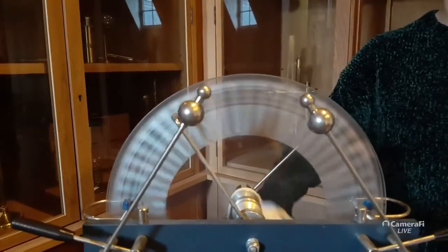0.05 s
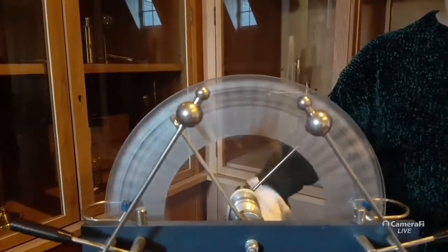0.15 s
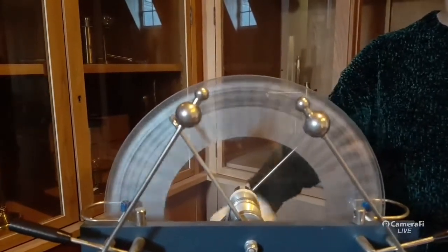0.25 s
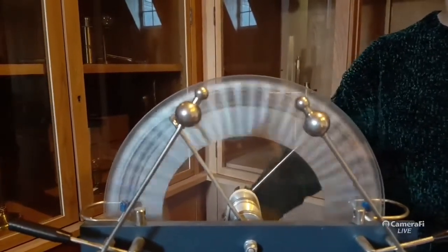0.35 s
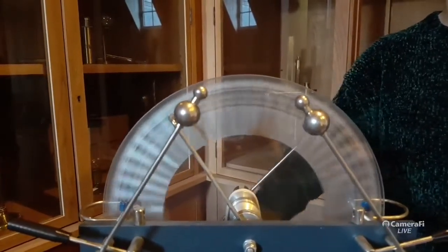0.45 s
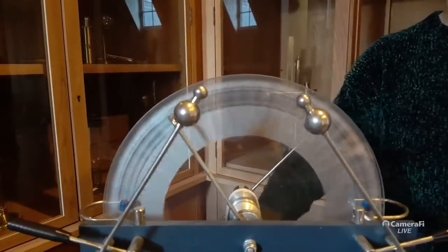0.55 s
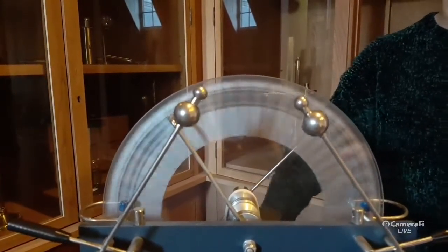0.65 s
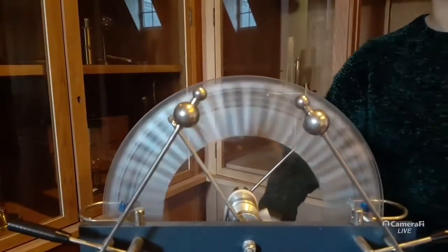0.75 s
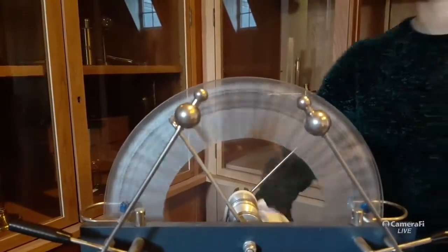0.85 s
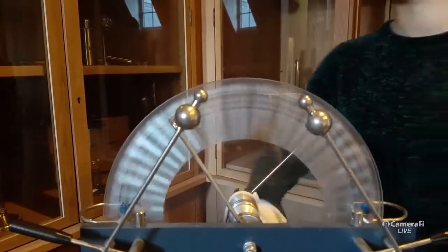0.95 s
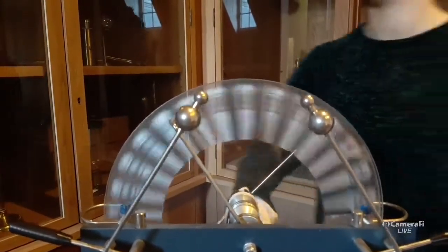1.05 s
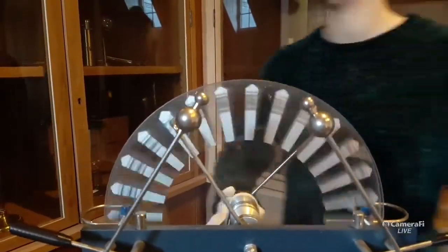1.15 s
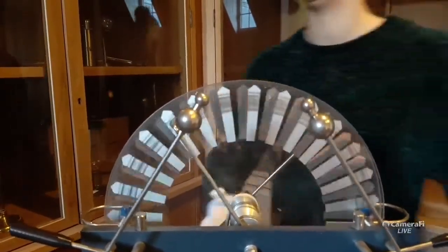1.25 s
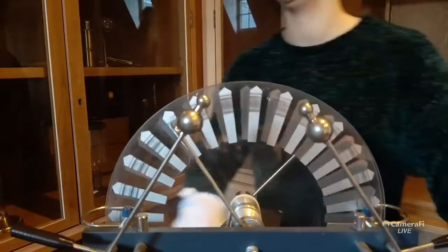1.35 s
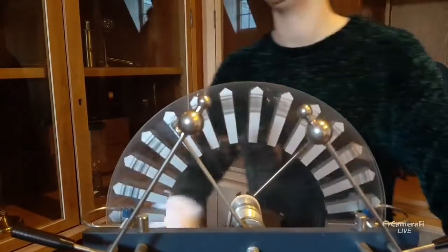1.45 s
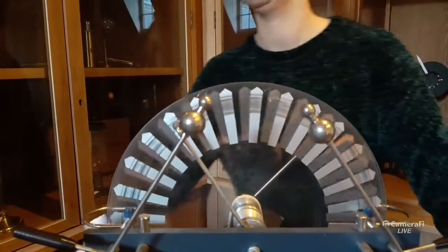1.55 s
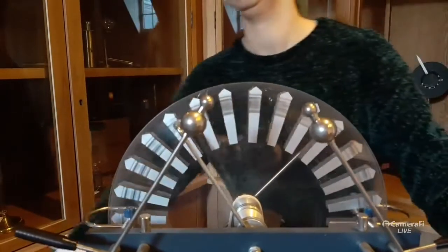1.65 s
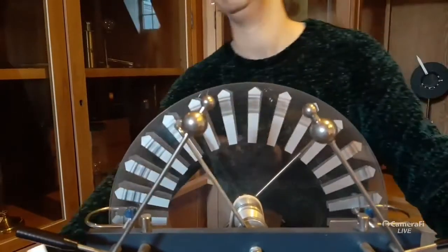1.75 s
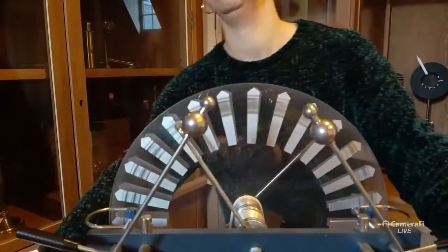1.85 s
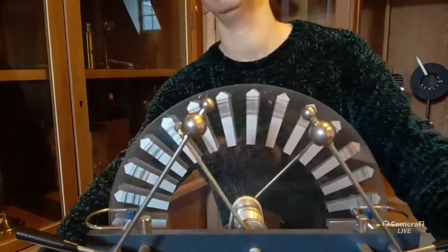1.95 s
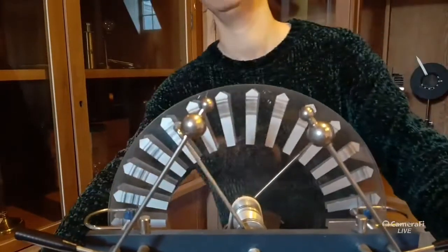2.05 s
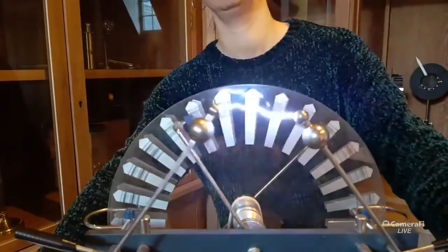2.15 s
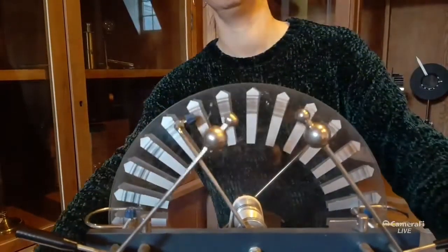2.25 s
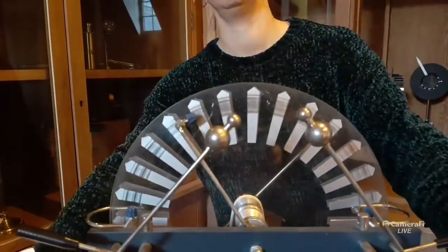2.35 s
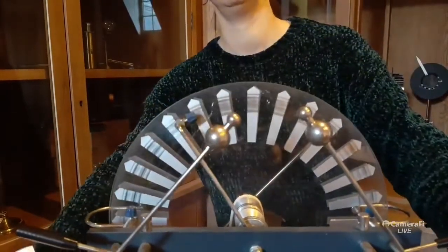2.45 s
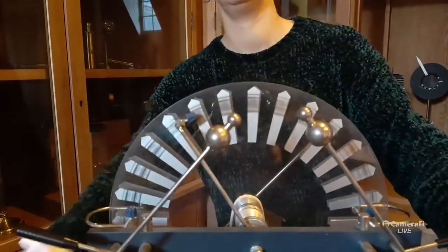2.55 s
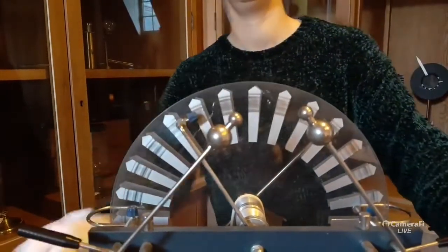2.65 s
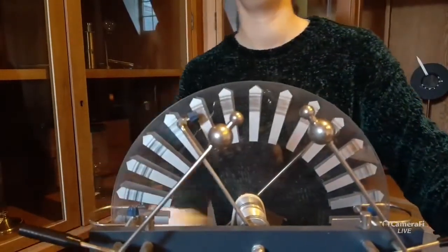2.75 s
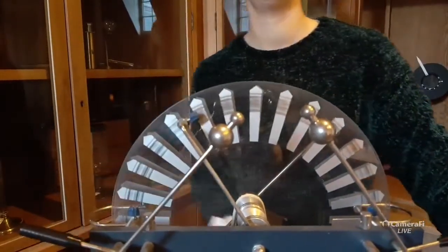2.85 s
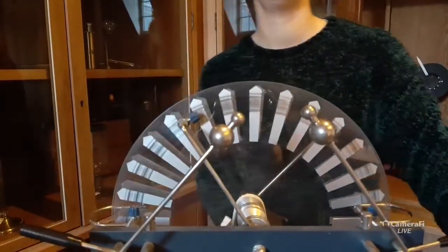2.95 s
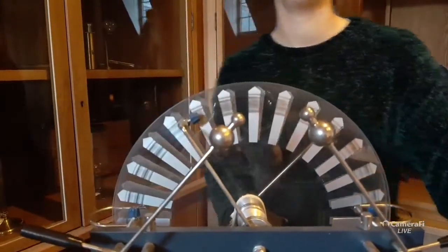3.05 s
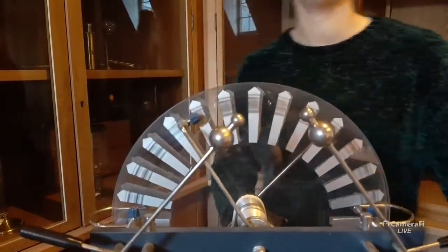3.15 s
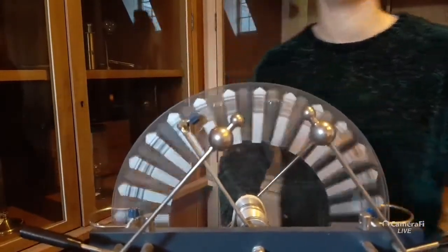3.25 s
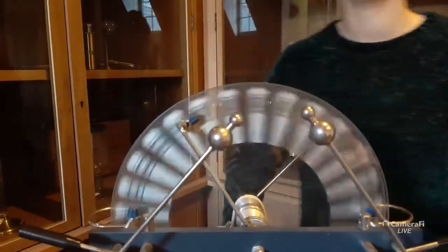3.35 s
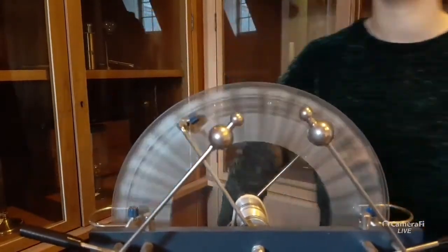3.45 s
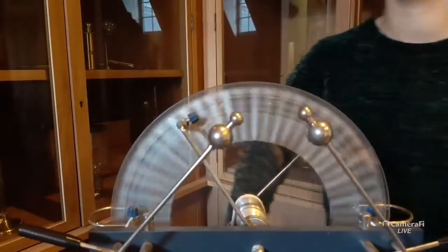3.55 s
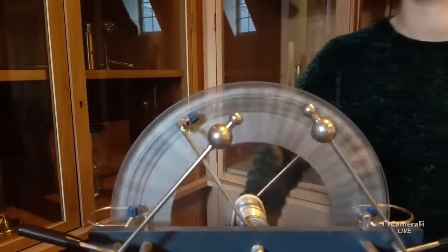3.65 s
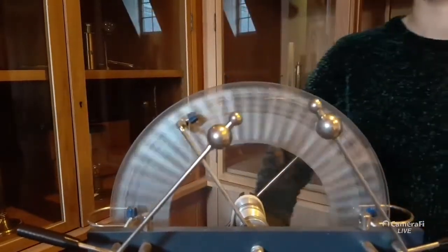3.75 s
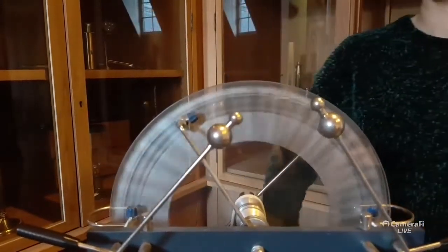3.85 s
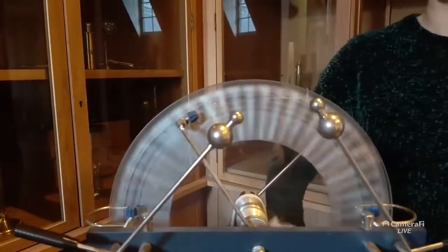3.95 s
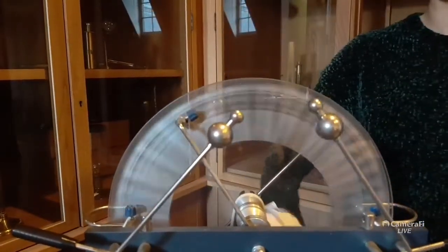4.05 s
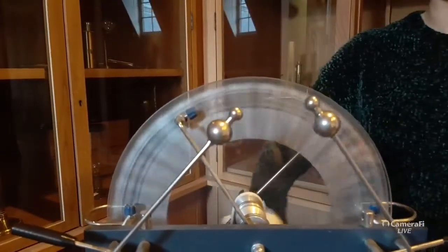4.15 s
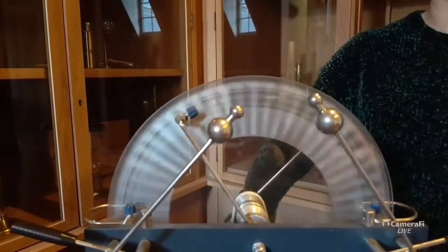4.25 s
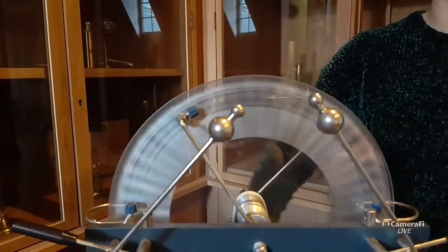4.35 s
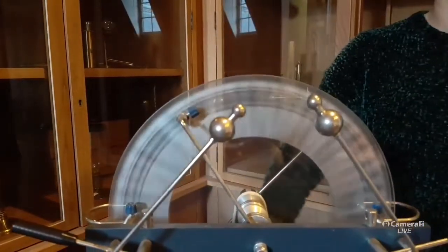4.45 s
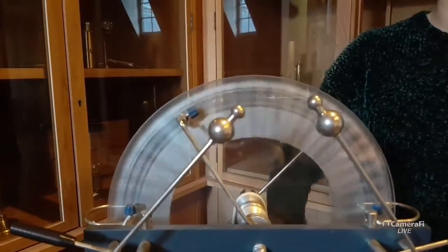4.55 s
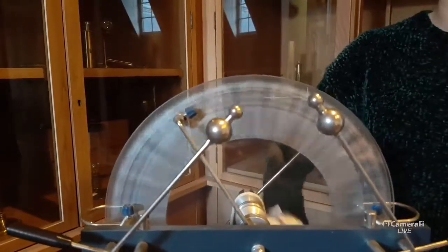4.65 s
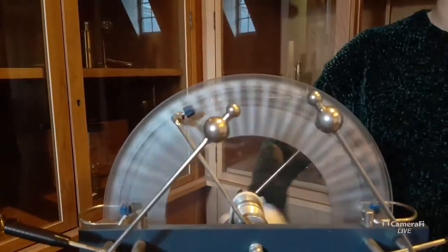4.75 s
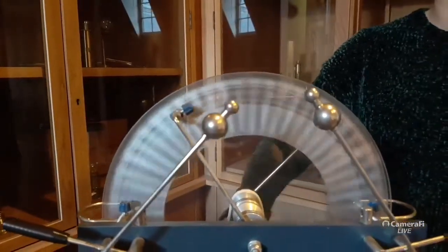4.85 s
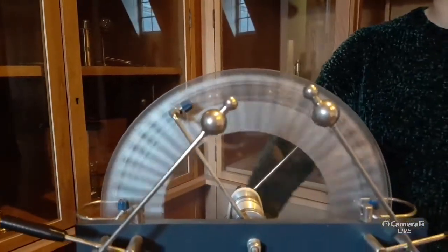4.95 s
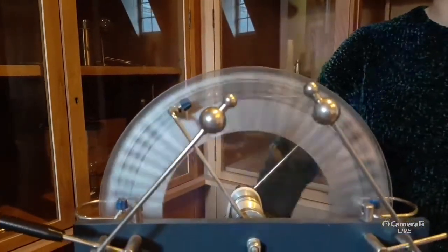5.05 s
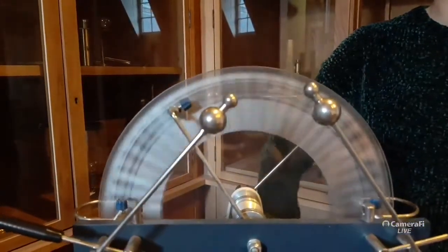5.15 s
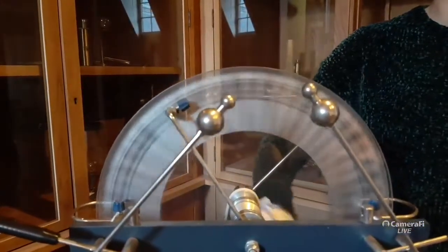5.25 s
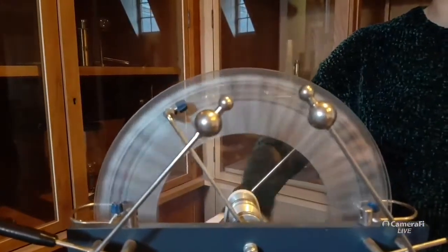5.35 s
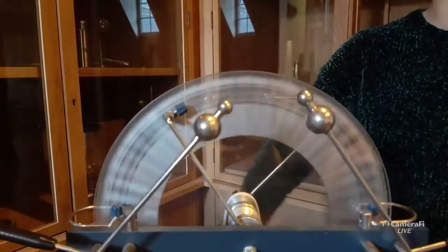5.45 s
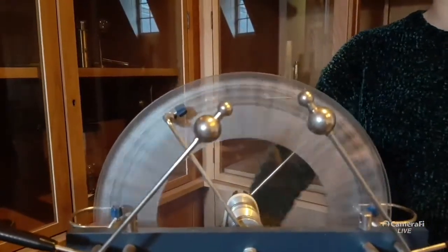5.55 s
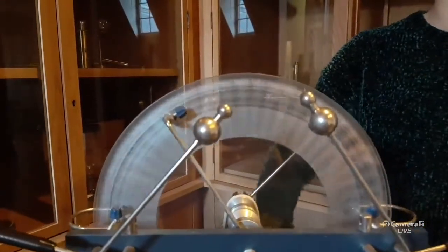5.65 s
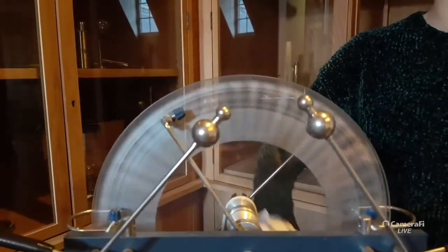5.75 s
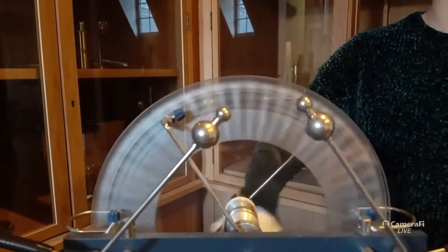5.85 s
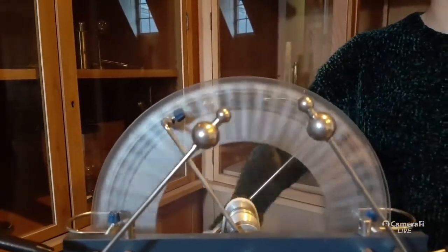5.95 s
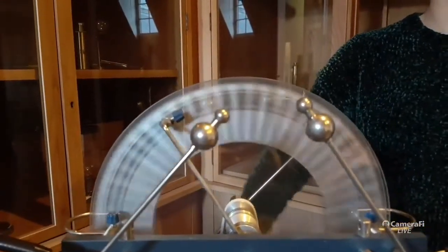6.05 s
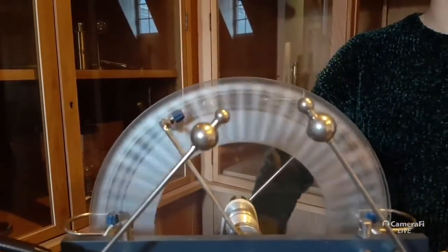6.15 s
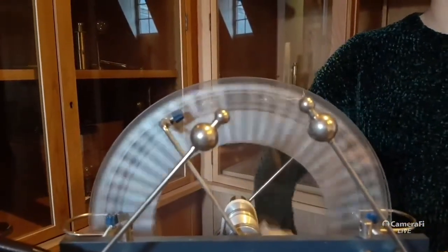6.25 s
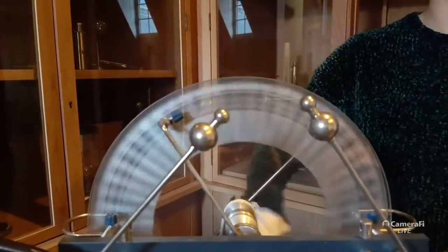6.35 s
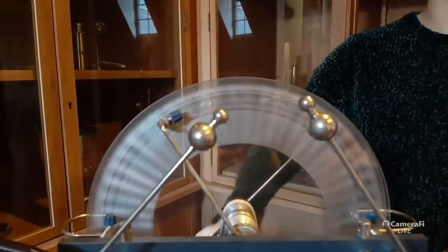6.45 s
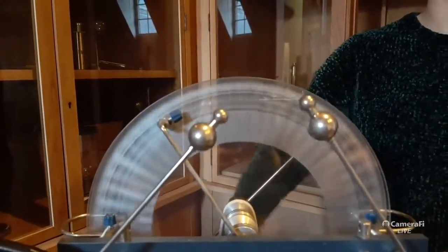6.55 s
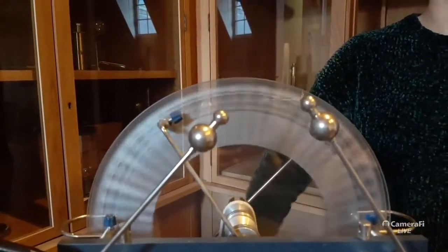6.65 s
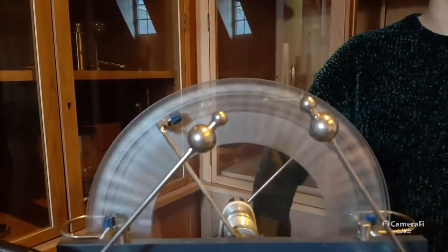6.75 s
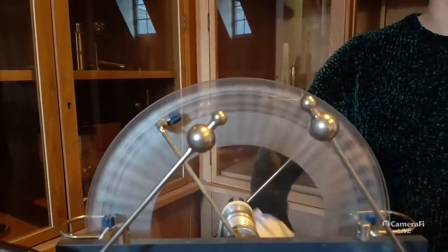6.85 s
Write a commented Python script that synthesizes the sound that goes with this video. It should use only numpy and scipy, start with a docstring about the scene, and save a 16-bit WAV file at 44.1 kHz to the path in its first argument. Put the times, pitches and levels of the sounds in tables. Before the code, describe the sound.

Rattling cranked discs with hissing, spitting brushes slow to near silence; a huge spark bangs, joint clicks, belt squeaks, and cranking resumes with two cracks.

```python
"""A hard-walled hall, with a hand-cranked influence machine close to the microphone.
Quiet noise and a thin tone lie underneath. Knocks and bearing rub ring the frame's resonances; the belt
rubs and squeaks, and a discharge rod clicks in its joint. Shaped noise makes the brushes scrape, fizz and spit.
Three big sparks, noise blasts with echoes, overload the microphone stage: its low-cut filter rings, the limiter
ducks and lets the hall's answer swell back."""
import sys
import numpy as np
from scipy import signal
from scipy.fft import rfft, irfft, next_fast_len
from scipy.io import wavfile
from scipy.ndimage import uniform_filter1d, minimum_filter1d, map_coordinates

SR = 44100
rng = np.random.default_rng(int(sys.argv[2]) if len(sys.argv) > 2 else 0)


def inscribe(sig):
    """Save sig as 16-bit PCM at rate SR to the path in sys.argv[1].

    A 1-D sig is mono; a 2-D sig holds one channel per row.
    Samples are clipped to [-1, 1] before scaling.
    """
    pcm = np.round(np.clip(np.atleast_2d(sig).T, -1, 1) * 32767)
    wavfile.write(sys.argv[1], SR, pcm.astype(np.int16))


N = 304290  # length in samples


def amp(db):
    """Gain of a level in dB."""
    return 10 ** (np.asarray(db) / 20)


def unit(x):
    """x at rms 1."""
    return x / np.sqrt(np.mean(x ** 2) + 1e-20)


def white():
    """White noise as long as the scene."""
    return rng.standard_normal(N)


def along(points, hz):
    """Reads a curve of (hz, value) points on a log frequency axis."""
    f, v = np.transpose(points)
    return np.interp(np.log(hz + 1), np.log(f + 1), v)


def curves(points):
    """One automation curve, a value per sample, for each column after the time."""
    s, *columns = np.transpose(points)
    return [np.interp(np.arange(N) / SR, s, c) for c in columns]


def wobble(rate):
    """A smooth random curve, rate knots a second."""
    return map_coordinates(rng.standard_normal(int(N * rate / SR) + 4), [np.arange(N) * rate / SR])


def filtered(x, response):
    """x times a complex response of frequency."""
    m = next_fast_len(len(x) + SR // 2)
    return irfft(rfft(x, m) * response(np.fft.rfftfreq(m, 1 / SR)), m)[:len(x)]


def coloured(x, spectrum):
    """x through a causal minimum-phase filter of that spectrum, which keeps the power of white noise."""
    gain = amp(along(spectrum, np.fft.rfftfreq(8192, 1 / SR)))
    cepstrum = irfft(np.log(np.maximum(gain, 1e-5)))
    cepstrum[1:4096] *= 2  # folding the cepstrum puts the energy first
    cepstrum[4097:] = 0
    h = irfft(np.exp(rfft(cepstrum)))
    return signal.fftconvolve(x, h / np.linalg.norm(h))[:len(x)]


def ringing(x, modes):
    """x through damped resonances; the mode levels set their balance."""
    def response(f):
        return sum(amp(db) * SR / (2 * np.pi) * c / (c * c - f * f + 1j * f * w) for c, w, db in modes)
    return filtered(x, response)


def add(track, s, sound):
    """Mixes a sound into a track at s seconds."""
    part = track[round(s * SR):][:len(sound)]
    part += sound[:len(part)]


# how long each frequency lives in the hall: pitch_hz, t60_s
HALL_DECAY = [(200, 0.67), (700, 0.87), (2000, 1), (4000, 0.96), (5500, 0.81), (8000, .64), (11000, 0.46),
              (16000, 0.39)]


def tail():
    """One answer of the hall, energy 1: noise in which each frequency dies at its own speed."""
    hz, t, z = signal.stft(rng.standard_normal(SR), SR, nperseg=256)
    fade = amp(-60 * t / along(HALL_DECAY, hz)[:, None])
    h = signal.istft(z * fade, SR, nperseg=256)[1]
    return h / np.linalg.norm(h)


def hall(x, db):
    """x with the hall's answer, which starts after a few ms."""
    return x + amp(db) * signal.fftconvolve(np.pad(x, (200, 0)), tail())[:N]


def struck(rows, modes, column, attack_s, rough_db, crunch_db, crunch_s):
    """Soft blows: modes swell, ring and die at varied strengths, with a puff of contact noise around them.

    column says which level of a row sets each mode: 0 middle, 1 low, 2 high."""
    out, puffs, t = np.zeros(N), np.zeros((3, N)), np.arange(SR // 12) / SR
    hz, width, mode_db = np.transpose(modes)[:, :, None]
    attack = 1 - np.exp(-t / attack_s)
    swell = attack ** 2 * np.exp(-np.pi * width * t)
    for (s, level_db, *rel_db), luck in zip(rows, rng.standard_normal((len(rows), 3, len(modes), 1))):
        group_db = level_db + np.array([0] + rel_db)
        gain = amp(group_db[column][:, None] + mode_db + 2 * luck[0])
        tones = np.sin(2 * np.pi * hz * (1 + 0.015 * luck[1]) * t + np.pi * luck[2])
        add(out, s - .001, np.sum(gain * swell * tones, 0))
        for track, db in zip(puffs, group_db):
            add(track, s, amp(db + crunch_db) * np.exp(-t / crunch_s) * attack)
    for group, (c, w, db) in zip(column, modes):
        band = signal.butter(2, [c / 1.242, c * 1.171], "band", fs=SR, output="sos")
        out += amp(db) * np.sqrt(SR / c) * signal.sosfilt(band, puffs[group] * white())
    return out * amp(rough_db * wobble(600))  # loose parts chatter while they ring


# noise floor colour: pitch_hz, relative level_db
QUIET_COLOUR = [(88, -29), (150, 1), (210, -11), (330, -18), (783, -24), (1620, -23), (1750, -18),
                (1860, -26), (9150, -36), (15000, -24), (16500, -39)]
# thin tone's fade in and out: time_s, peak level_db
TONE_FADE = [(1.95, -110), (2.05, -76.5), (2.4, -83), (3.45, -86), (3.7, -110)]
QUIET_DB = -72.5  # rms


def background():
    """Quiet hall noise and a thin sine tone that comes and goes."""
    tone = amp(curves(TONE_FADE)[0]) * np.sin(2 * np.pi * 1736 * np.arange(N) / SR)
    return amp(QUIET_DB) * coloured(white(), QUIET_COLOUR) + tone


# how hard the machine is driven, also for brushes and belt: time_s, frame drone level_db before its wobble
DRIVE = [(0, -42), (.4, -42), (.85, -46), (1.04, -43), (1.12, -50.5), (1.3, -79), (1.45, -95), (3.45, -95),
         (3.63, -64.5), (4.04, -61.5), (4.5, -49), (4.65, -45), (5.15, -43), (5.6, -49.5), (6.1, -50),
         (6.3, -47), (6.9, -48)]
RATTLE_DB = 0.5  # centre level of the small knocks over the drone


def chance_knocks(count):
    """Small knocks at random moments, following the drive, each with its own balance of modes."""
    moment, luck = rng.random(count) * N / SR, rng.standard_normal((count, 3))
    level_db = np.interp(moment, *np.transpose(DRIVE)) + RATTLE_DB + 3 * luck[:, 0]
    return np.column_stack([moment + .002, level_db, 4 * luck[:, 1:]])


# louder knocks of crank and pulleys: start_s, main modes level_db, low modes relative_db, high modes relative_db
LOUD_KNOCKS = [(.013, -31, -5, -16), (.036, -26.5, -9, -13), (.051, -32.5, 3, 7.5),
               (.068, -23.5, 1.5, -2.1), (.189, -29.5, 2, 0), (.205, -52, 26, 30.5), (.22, -37, 10, 2),
               (.274, -23.5, -2, -5), (.303, -25.5, -2, -6.5), (.415, -24.5, -22, -21),
               (.433, -22, -18, -14), (.461, -28, -3.5, -7), (.538, -22, -5.5, -8.5), (.587, -29, -10, 1),
               (.603, -24.5, -0.5, -1.5), (.631, -38.5, 11, -10), (.734, -44.5, 2.1, 14.5),
               (.748, -31.5, 4, 0.5), (.762, -44, 17, 11), (.779, -31, 7.5, 10), (.889, -29, .1, -8.5),
               (.978, -28.5, -13, -20), (1.004, -29.5, -4, -4), (1.031, -34, 5, 2), (1.315, -57.5, -6, -23),
               (1.346, -56.5, -20, -12), (3.839, -49, -16, -4), (3.974, -38.5, -11, -15),
               (3.991, -32, -28, -14), (4.011, -34, -4.5, -13), (4.048, -40.5, 0, -11),
               (4.077, -36.5, -3.5, -25), (4.195, -38.5, -7, -7), (4.266, -39, -12, -20),
               (4.307, -29, -13, -20), (4.327, -24.5, -16, -18), (4.58, -37, 0, -8), (4.599, -18, -11, -11),
               (4.687, -35.5, 1, -10.5), (4.715, -24, -8, -13), (4.769, -24, -8, -7),
               (4.803, -29.5, 3.5, 0), (4.83, -38.5, 11, 7.5), (4.911, -49, 18.5, -5), (5.034, -40, 5, 12),
               (5.049, -32, 7, -5), (5.061, -41, 11.5, 18.5), (5.075, -18.5, -3, -11.5),
               (5.106, -29.5, -11, -16), (5.181, -19, -9.5, -23.5), (5.285, -40.5, 9, -2),
               (5.522, -38, 7, 5), (5.536, -35, -2, -5), (5.624, -25, -14, -19), (5.733, -39, 6.5, 6.5),
               (5.748, -21.5, -32, -10.5), (5.762, -32.5, -2, -6), (5.844, -22, -10, -17.5),
               (5.94, -49.5, -6, 11), (5.972, -32.5, -3, -4), (6.051, -32, -3, -6),
               (6.081, -30.5, 0.5, -11), (6.095, -46, 14, 11), (6.156, -37, -1, -5), (6.174, -34.5, -7, .6),
               (6.188, -36, 1.1, -4), (6.203, -30.5, -4, -1), (6.281, -21.5, -10, -11.5),
               (6.359, -40, -1, -7), (6.389, -33, -7, -5), (6.406, -23, -16, -23), (6.416, -29.5, 5.5, 0.5),
               (6.627, -30.5, 1, 1), (6.712, -22.5, -12, -14), (6.74, -33, -1, -4), (6.823, -33, -3, 0),
               (6.836, -21, -23, -8), (6.845, -25, -8.5, -12), (6.87, -29, -7, -13)]
# frame resonances: pitch_hz, width_hz when struck, relative level_db
FRAME_MODES = [(364, 130, -0.5), (573, 176, 6), (968, 22.6, -5), (1070, 58, -4.5), (1457, 98, 4.5),
               (2100, 89, -5), (2414, 150, 0), (3060, 170, -12.5)]
# table rumble colour: pitch_hz, relative level_db
TABLE_COLOUR = [(12, -40), (20, -5), (43, 15.5), (69, -6), (97, 13), (108, 5.5), (136, 0), (179, -1),
                (227, -10), (286, 2), (310, -9.5), (350, -2.5), (460, -33.5), (770, -120)]
TABLE_DB, TABLE_REST_DB = -5, -60.5  # shaking over the drone; constant rumble before its wobble and bass filter
COAST_S = .19  # time constant with which the shaking follows the drive


def frame():
    """Knocks ring the frame; the bearings drone through the same modes and shake the table."""
    knocks = struck(np.vstack([LOUD_KNOCKS, chance_knocks(count=130)]), FRAME_MODES,
                    column=[1, 1, 0, 0, 2, 2, 2, 2], attack_s=0.00075,
                    rough_db=1.5, crunch_db=-12.5, crunch_s=0.0066)
    grit = amp(1.2 * wobble(70)) * white()
    damped = [(hz, 3 * width, db) for hz, width, db in FRAME_MODES]  # a rubbing bearing damps the modes
    drone = amp(curves(DRIVE)[0] + 1.6 * wobble(9.8))
    shaking = np.abs(filtered(drone, lambda hz: 1 / (1 + 2j * np.pi * hz * COAST_S)))
    rumble = amp(TABLE_DB) * shaking * coloured(white(), TABLE_COLOUR)
    # a constant bass rumble remains when the discs stand still
    deep = filtered(coloured(white(), TABLE_COLOUR), lambda hz: 1 / (1 + (hz / 160) ** 4))
    rumble = rumble + amp(TABLE_REST_DB + 1.3 * wobble(3.6)) * deep
    return hall(knocks, db=-13) + drone * unit(ringing(grit, damped)) + rumble


# pulley resonances before friction broadens them: pitch_hz, width_hz, relative level_db
PULLEY_MODES = [(2100, 42, -4.5), (2465, 56, 2), (3140, 120, 4.5), (3500, 80, 0), (4160, 86, 0),
                (4620, 100, 1), (5160, 130, -6)]
# belt rubbing harder on a push of the crank: peak_s, level_db, time to fall 20 dB on each side fall_s
CRANK_PUSHES = [(3.83, -57, .13), (4.015, -50, .08), (4.2, -51, .09), (4.35, -50, .085), (4.505, -46, .08),
                (4.625, -48, .07), (4.72, -45, .04), (4.79, -49, .14), (4.96, -50, .1), (5.06, -44, .07),
                (5.75, -51, .05), (6.19, -49, .05), (6.418, -40, .012)]
RUB_DB = -19.5  # steady rub over the frame drone's curve


def belt():
    """Rough friction noise through the pulley's resonances, swelling with each push."""
    t = np.arange(N) / SR
    rub = amp(curves(DRIVE)[0] + RUB_DB)
    for s, db, fall in CRANK_PUSHES:
        rub += amp(db - 20 * ((t - s) / fall) ** 2)
    grit = amp(3 * wobble(120)) * white()
    broad = [(hz, 2.2 * width, db) for hz, width, db in PULLEY_MODES]
    return rub * unit(ringing(grit, broad))


# clicks of the rod's joint: start_s, middle modes level_db, low modes relative_db, bright modes relative_db
JOINT_CLICKS = [(3.0105, -38, -15.5, -5.5), (3.014, -31, -8.5, -4), (3.0539, -26.5, -15.5, 8),
                (3.0578, -21, -8.5, -40), (3.1098, -34, -8, -16), (3.1157, -41, -23, -4),
                (3.2027, -49, 0, -21), (3.2197, -31.5, -11, -7), (3.2236, -32.5, -4.5, -21),
                (3.255, -59.5, -18.5, -14.5), (3.2602, -40.5, 2.5, -29)]
# rod resonances: pitch_hz, width_hz, relative level_db
ROD_MODES = [(315, 63, -9), (469, 79, -3.5), (798, 240, 4), (1145, 180, 1), (1514, 70, -6),
             (2070, 51, -14.5), (2450, 240, -4), (3450, 930, 2.5), (4250, 310, -4), (5150, 1550, -11),
             (6800, 510, -9)]


def rod():
    """The discharge rod clicks in its joint and rings its damped modes."""
    clicks = struck(JOINT_CLICKS, ROD_MODES, column=[1, 1, 1, 0, 0, 0, 0, 2, 2, 2, 2], attack_s=0.0006,
                    rough_db=3.5, crunch_db=-20, crunch_s=0.0079)
    return hall(clicks, db=-15.5)


# belt squeaks, one list for each singing partial: time_s, pitch_hz, dry rms level_db
SQUEAK_PARTIALS = [
    [(3.57, 4220, -67), (3.586, 4205, -40.5), (3.614, 4286, -32.5), (3.625, 4500, -39)],
    [(3.618, 4770, -48), (3.644, 4613, -42), (3.666, 4600, -57), (3.684, 4655, -58), (3.695, 4634, -62)],
    [(3.575, 10900, -74), (3.619, 11098, -60), (3.635, 11267, -72), (3.66, 11108, -72)],
    [(4.475, 3986, -56), (4.495, 4026, -47), (4.51, 4100, -65)],
]


def squeak():
    """The belt slips on the pulley and sings: gliding sines with a weak second harmonic."""
    out, t = np.zeros(N), np.arange(N) / SR
    for rows in SQUEAK_PARTIALS:
        hz, db = curves(rows)
        on = np.clip(np.minimum(t - rows[0][0], rows[-1][0] - t) / 0.0043, 0, 1)
        phase = 2 * np.pi * np.cumsum(hz) / SR
        out += on * amp(db) * np.sqrt(2) * (np.sin(phase) + amp(-35.5) * np.sin(2 * phase))
    return hall(out, db=-14)


# foil sectors passing a brush: time_s, rate_per_s
SECTOR_RATE = [(0, 102), (.8, 98), (.95, 86), (1.2, 40), (1.45, 12), (1.5, .2), (3.42, .2), (3.55, 36),
               (3.75, 70), (4.22, 83), (4.45, 95), (4.65, 109), (5.15, 120), (5.5, 126), (6, 127),
               (6.45, 132), (6.9, 132)]
# sectors that pass after each spark until the hiss is halfway back: one count per spark
RECHARGE_SECTORS = [68.5, 133, 106]
RECHARGE_SPREAD = 18  # sectors; smaller = a more sudden return
EMPTY_DB, FULL_DB = -58.5, -44.5  # corona hiss when empty and at full charge, before stalling
STALL_PER_S, STALL_DB = 75, 45  # under this sector rate the hiss falls, dB for a tenth of the rate


def corona_db():
    """The hiss follows the charge: sparks empty it, passing sectors refill it, and it dies as the discs stall."""
    speed, charge = curves(SECTOR_RATE)[0], np.ones(N)
    passed = np.cumsum(speed) / SR
    for (s, *_), halfway in zip(SPARK_EVENTS, RECHARGE_SECTORS):
        start = round(s * SR)
        since = passed[start:] - passed[start]
        charge[start:] = 1 / (1 + np.exp((halfway - since) / RECHARGE_SPREAD))
    stall = STALL_DB * np.minimum(0, np.log10(speed / STALL_PER_S))
    return EMPTY_DB + (FULL_DB - EMPTY_DB) * charge + stall


# brush discharges: start_s, level_db before shaping, length_s
BRUSH_SPITS = [(.016, -25.5, .011), (.07, -25, 0.0097), (.107, -29.5, 0.023), (.211, -25.5, 0.026),
               (.3357, -22.5, 0.0085), (.393, -44, .002), (.399, -24.5, 0.0125), (.434, -28, .001),
               (.495, -23.5, 0.0057), (.531, -21.5, 0.0052), (.542, -29, 0.0011), (.587, -29, 0.024),
               (.715, -25.5, 0.0091), (.7325, -21, 0.0013), (.75, -25.5, .02), (.89, -24.5, 0.0092),
               (.95, -17, 0.00024), (.959, -24, 0.0044), (.986, -23, 0.00082), (1.002, -32, 0.0188),
               (1.102, -32.5, .00067), (1.157, -34, 0.001), (1.192, -31, 0.00047), (1.2371, -20, 0.00022),
               (1.333, -48, 0.00069), (1.383, -36, 0.00042), (2.197, -57.5, 0.0011), (3.602, -42.5, 0.0014),
               (4.788, -29.5, .001), (5.024, -32.5, .0013), (5.057, -35, .002), (5.133, -29, 0.0024),
               (5.1648, -7.5, 0.00086)]
# corona colour: pitch_hz, relative level_db
CORONA_COLOUR = [(1470, -29.5), (2500, -7), (2860, -21.5), (3710, -7), (5090, -4), (6300, -6.5), (7490, 1),
                 (8430, -10), (9570, -8), (10500, -2.5), (14200, 2.5), (16000, -4), (16500, -18)]
# colour of wire brushes on the discs: pitch_hz, relative level_db
SCRAPE_COLOUR = [(1530, -26), (2600, -4.5), (2870, -7.5), (3150, 0), (3480, -0.5), (3780, -9.5), (4530, 1),
                 (4980, -7), (5470, -7.5), (5820, -1), (7580, 0), (8500, -12), (9000, -15), (11700, -45),
                 (19800, -120)]
SCRAPE_DB = -6.5  # noise of the scrape over the frame drone's curve


def brushes():
    """The brushes scrape the discs, hiss, tick as the foil sectors pass, and spit short dense discharges."""
    hiss_db, scrape_db = corona_db(), curves(DRIVE)[0] + SCRAPE_DB
    speed = curves(SECTOR_RATE)[0]
    count = np.floor(np.cumsum(speed) / SR + .06 * wobble(60))  # slightly uneven spacing
    passed = np.diff(count, prepend=0) > 0
    sizes = passed * amp(2.5 * white())
    ticks = unit(signal.lfilter([1], [1, -.975], sizes) * white())
    ticks = ticks * np.clip(STALL_PER_S / speed, 1, 3)  # they stand out as the discs slow
    fizz = amp(hiss_db + 1.5 * wobble(25)) * (white() + .6 * ticks)
    scrape = amp(scrape_db + 2 * wobble(18)) * (white() + .8 * ticks)
    spits, t = np.zeros(N), np.arange(SR // 10) / SR
    for s, db, length in BRUSH_SPITS:
        sag = -5 * t / max(length, .0003)
        break_off = -60 * np.maximum(t - length, 0) / (0.024 + length)
        add(spits, s, amp(db + sag + break_off) * (1 - np.exp(-t / .0003)))
    streamers = amp(1.7 * wobble(900)) * white()  # a discharge is a swarm of tiny sparks
    discharges = hall(coloured(spits * streamers, CORONA_COLOUR), db=-10.5)
    return coloured(fizz, CORONA_COLOUR) + coloured(scrape, SCRAPE_COLOUR) + discharges


# big sparks: start_s, crack level_db, overload offset level_db before its onset, offset decay_s, hall level_db
SPARK_EVENTS = [(2.3265, 25.5, 27, 0.0023, 21), (5.1996, 10.5, 18.5, 0.0049, 17),
                (6.4775, 11, 21, 0.0023, 18.5)]
# near wall reflections: lag_s, centre level_db relative to the crack
WALL_ECHOES = [(.0047, -17), (.0097, -13), (.0146, -17), (.0280, -26)]
# crack colour: pitch_hz, relative level_db
CRACK_COLOUR = [(100, -31), (400, 1.5), (1200, -3), (3000, -9.5), (7000, -13), (9000, -22.5), (12000, -10),
                (16000, -8.5)]
# colour of the hall's first answer to a spark: pitch_hz, relative level_db
ECHO_COLOUR = [(88, -54.5), (150, -27.5), (479, -15), (656, -12), (847, -16), (1030, -12.5), (1440, -14),
               (2010, -7), (2450, -9.5), (4780, -5), (7220, -1.5), (8620, -9.5), (11100, 1), (15600, -3),
               (16500, -44.5)]


def sparks():
    """A blast scattered by balls and discs, wall echoes, the hall, and the overloaded capsule's offset."""
    blast, echo, offset = np.zeros((3, N))
    t = np.arange(SR // 10) / SR
    wave = (1 - t / .0001) * np.exp(-t / .0001)  # overpressure, then suction
    fade = amp(-60 * np.maximum(t - .003, 0) / .005)  # full for 3 ms, then 60 dB down in 5 ms
    for s, crack_db, offset_db, decay, hall_db in SPARK_EVENTS:
        add(blast, s, amp(crack_db) * rng.standard_normal(len(t)) * fade)
        for lag, db in WALL_ECHOES:
            add(blast, s + lag, amp(crack_db + db + rng.normal(0, 1.5)) * wave)
        add(offset, s + 0.003, -amp(offset_db) * np.exp(-t / decay) * (1 - np.exp(-t / 0.0013)))
        add(echo, s + 0.0017, amp(hall_db) * tail())
    return coloured(blast, CRACK_COLOUR) + coloured(echo, ECHO_COLOUR) + offset


def scene():
    """All sources at the one microphone."""
    return (background() + frame() + belt() + rod() + squeak() + brushes() + sparks())[None]


TOP_HZ = 16800  # nothing passes from here up


def record(dry):
    """Low-cut filter, a limiter whose gain climbs back at a steady pace, clipping, band limit."""
    x = signal.sosfilt(signal.butter(4, 44, "high", fs=SR, output="sos"), dry[0])
    need = minimum_filter1d(np.minimum(1, 1.53 / (np.abs(x) + 1e-9)), size=31)
    climb = np.arange(N) / (0.048 * SR)  # from zero to full gain in 48 ms
    gain = np.minimum(1, climb + np.minimum.accumulate(need - climb))
    x = np.clip(x * uniform_filter1d(gain, size=15), -.92, .92)

    def edge(hz):
        shelf = amp(np.interp(hz, [15650, 15900, TOP_HZ], [0, -26, -34]))
        return np.where(hz < TOP_HZ, shelf, 0)
    return filtered(x, edge)[None]


dry = scene()
out = record(dry)
inscribe(out)
```